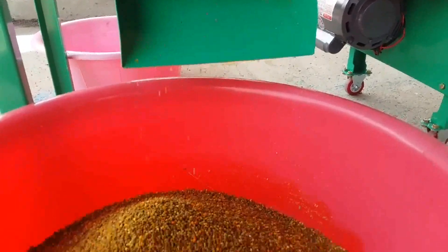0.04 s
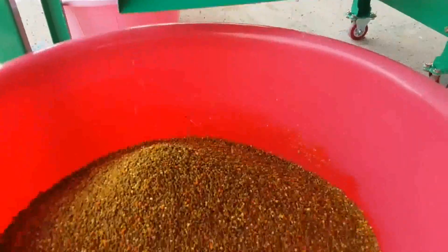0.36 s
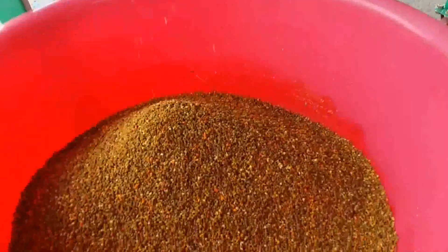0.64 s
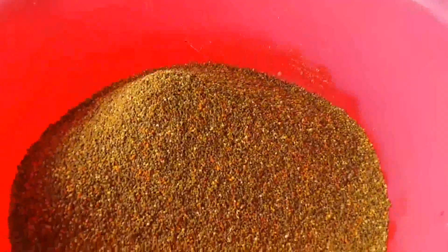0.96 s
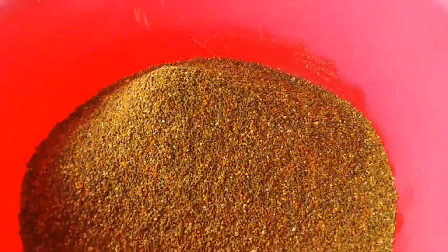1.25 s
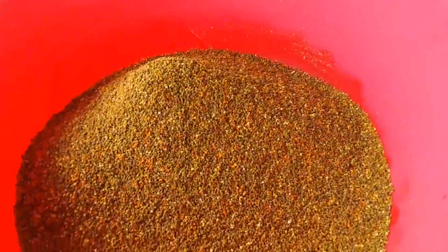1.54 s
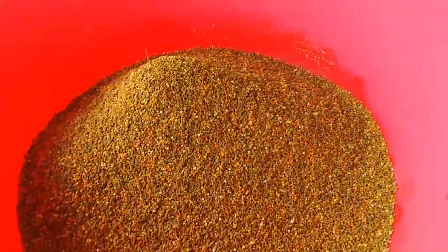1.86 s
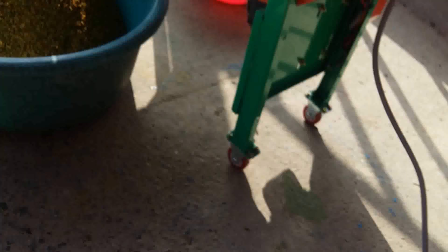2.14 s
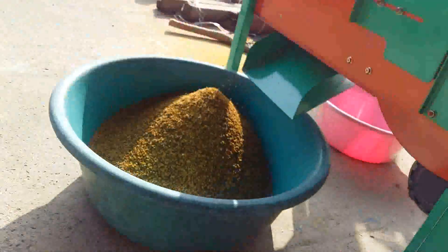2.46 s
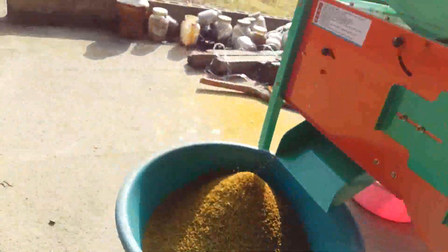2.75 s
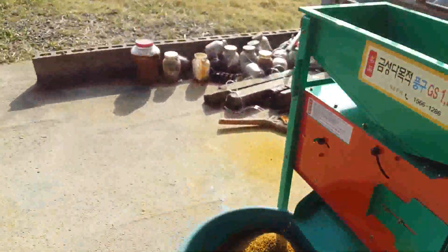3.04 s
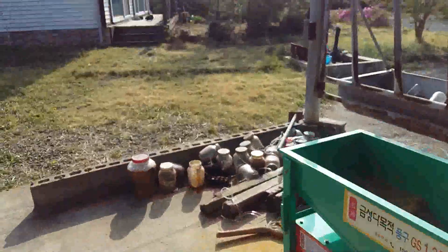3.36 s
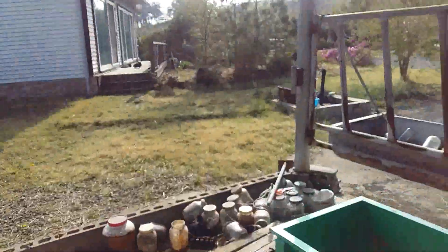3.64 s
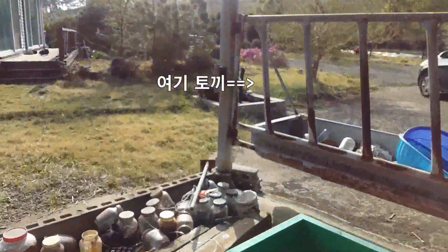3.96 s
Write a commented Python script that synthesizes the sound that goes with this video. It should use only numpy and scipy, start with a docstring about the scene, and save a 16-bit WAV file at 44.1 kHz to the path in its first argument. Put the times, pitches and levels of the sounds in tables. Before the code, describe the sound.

A sorting machine hums and rattles in a yard, heard close up, as fine granules patter into a plastic tub. The sound drops out twice, then fades in a step away with light sieve knocks and faint shoe scuffs.

```python
"""Pollen sorter in a yard

A motor hums at twice the mains rate, its shaft shakes the sheet-metal housing, and the sieves rattle.
Pollen granules trickle into a plastic tub, with a few faint squeaks and ticks.
It is heard first from beside the tub. The sound drops out twice, then fades in from a step away,
where the sieves knock and shoes scuff the concrete."""
import sys
import numpy as np
from scipy.fft import rfft, irfft, next_fast_len
from scipy.io import wavfile
from scipy.ndimage import map_coordinates

SR = 44100
rng = np.random.default_rng(int(sys.argv[2]) if len(sys.argv) > 2 else 0)


def put_to_file(sound):
    """Save the sound as 16-bit audio at rate SR, in the file named by the first command-line argument."""
    columns = np.atleast_2d(sound).T  # one column per channel
    safe = np.clip(columns, -1, 1)
    whole_steps = np.round(safe * 32767)
    wavfile.write(sys.argv[1], SR, whole_steps.astype(np.int16))


N = 176400

HUM_HZ, SHAFT_HZ = 120.0, 24.32
SIEVE_HZ, SIEVE_WIDTH_HZ = 523.5, 50  # the sieve's hollow ring
NEAR, AWAY = 0, 1  # where the listener stands: beside the tub, or a step away


def amp(db):
    """Turn decibels into a gain."""
    return 10 ** (np.asarray(db) / 20)


def unit(x):
    """Scale a signal to an average strength (rms) of 1."""
    return x / np.sqrt(np.mean(x ** 2) + 1e-20)


def clock():
    """The time of every sample, in seconds."""
    return np.arange(N) / SR


def along(points, hz):
    """Read between (frequency, value) points on a logarithmic frequency scale."""
    freqs, values = np.transpose(points)
    return np.interp(np.log(hz + 1), np.log(freqs + 1), values)


def curve(rows):
    """Join (time, value) points with straight lines, one value a sample."""
    return np.interp(clock(), *np.transpose(rows))


def wobble(rate):
    """A smooth curve through `rate` random values a second."""
    return map_coordinates(rng.standard_normal(int(N * rate / SR) + 4), [clock() * rate])


def swell(start, length):
    """A rounded rise and fall."""
    return np.sin(np.pi * np.clip((clock() - start) / length, 0, 1))


def pan(db):
    """Left and right gains that make the left side `db` louder than the right."""
    gains = amp(np.array([np.atleast_1d(db), -np.atleast_1d(db)]) / 2)
    return gains / gains.mean(axis=0)


def filtered(x, response):
    """Multiply each frequency in x by response(hz)."""
    size = next_fast_len(N + SR // 4)
    return irfft(rfft(x, size) * response(np.fft.rfftfreq(size, 1 / SR)), size)[..., :N]


def noise(colour):
    """Stereo noise shaped by colour(hz); the two sides match in the bass and differ in the treble."""
    # how alike left and right are (1 = the same): f/Hz, likeness
    likeness = [(30, 1), (120, 1), (300, 0.85), (600, 0.68), (1100, 0.52), (2200, .08), (12000, 0.039)]

    def shares(hz):
        angle = np.arccos(np.clip(along(likeness, hz), -1, 1)) / 2
        return colour(hz) * np.array([np.cos(angle), np.sin(angle)])

    mid, side = filtered(rng.standard_normal((2, N)), shares)
    return np.array([mid + side, mid - side]) / mid.std()


def rotation(hz, drift):
    """The angle of something that turns at a nearly steady rate."""
    return 2 * np.pi * np.cumsum(hz * (1 + drift * wobble(6.804))) / SR


def tone(angle):
    """A sine wave of strength (rms) 1 that starts anywhere in its cycle."""
    return np.sqrt(2) * np.sin(angle + rng.uniform(0, 2 * np.pi))


def overtones(angle, rows, place, waver_db=1.8):
    """Tones at whole multiples of one rate, each wavering a little in level."""
    return sum(amp(db[place] + waver_db * wobble(9)) * tone(round(k) * angle) for k, *db in rows)


def ring(centre, width):
    """A part shaken at random rings in a narrow band around its own pitch."""
    return noise(lambda hz: 1 / (1 + ((hz - centre) / width) ** 2))


def motor_hum(angle, place, level_db):
    """The motor hums at twice the mains rate; overtones add a buzz."""
    # overtones of the hum: multiple, near level/dB, away level/dB
    buzz = [(2, -39, -45), (3, -37.5, -42), (5, -41.5, -48.5), (6, -44, -48), (7, -46, -62),
            (8, -44.5, -52), (10, -49, -69)]
    return amp(level_db) * tone(angle) + overtones(angle, buzz, place)


def shaft_shake(angle, place):
    """The shaft shakes the housing at multiples of its turning rate."""
    # tones of the shaking: multiple, near level/dB, away level/dB
    shake = [(3, -50, -52.5), (4, -30, -43), (6, -29.5, -37), (7, -43, -51), (8, -47, -50), (9, -44, -44.5),
             (10, -50, -59), (11, -36, -37.5), (12, -46, -39), (13, -44, -67), (15, -60, -48.5),
             (19, -42, -47.5), (21, -53, -44.5), (22, -54, -57), (24, -42, -52), (29, -42, -71)]
    return overtones(angle, shake, place)


def sieve_stroke(peak_s=3.042):
    """The sieve swings to and fro, between -1 and 1, once for two turns of the shaft."""
    return np.cos(np.pi * SHAFT_HZ * (clock() - peak_s))


def rattle(place, colour, rattle_db, sieve_db):
    """The shaken housing and sieves make a broad noise, and the sieve and metal panels ring."""
    # ringing panels: f/Hz, width/Hz, near level/dB, away level/dB
    panels = [(281, 36, -43, -40.5), (630, 30, -42.5, -49.5), (701, 39, -50, -50.5), (820, 50, -40, -61),
              (949, 36, -40, -51.5), (1186, 34, -38, -47), (1248.6, 12, -39, -50), (2074, 12, -48, -56),
              (2500, 18, -49.5, -69)]
    sound = amp(rattle_db) * noise(lambda hz: amp(along(colour, hz)))
    sound += amp(sieve_db) * ring(SIEVE_HZ, SIEVE_WIDTH_HZ)
    for centre, width, *db in panels:
        sound += amp(db[place]) * ring(centre, width)
    return sound


def flutter(sound, hum_angle, shaft_angle, flutter_db, shaft_depth=0.11, hum_depth=0.071):
    """Above the bass, the rattle pulses with the shaft and the hum, and flickers at random."""
    shaft_pulse = tone(shaft_angle) / 2 + tone(2 * shaft_angle) + tone(4 * shaft_angle)
    hum_pulse = tone(hum_angle) + tone(2 * hum_angle)
    drive = unit(np.exp((shaft_depth * shaft_pulse + hum_depth * hum_pulse) / 2))
    bass = filtered(sound, lambda hz: 1 / (1 + (hz / 220) ** 4))
    return bass + (sound - bass) * drive * amp(flutter_db * wobble(28.08))


def machine(place, hum_db, colour, balance, rattle_db, sieve_db, flutter_db):
    """The motor, the shaft and the rattle they drive, spread between left and right."""
    hum_angle = rotation(HUM_HZ, drift=.0005)
    shaft_angle = rotation(SHAFT_HZ, drift=.0025)
    tones = motor_hum(hum_angle, place, hum_db) + shaft_shake(shaft_angle, place)
    rattling = rattle(place, colour, rattle_db, sieve_db)
    rattling = flutter(rattling, hum_angle, shaft_angle, flutter_db)
    return filtered(tones + rattling, lambda hz: pan(along(balance, hz)))


def machine_near():
    """The sorter from beside the tub: a strong hum over an even rattle."""
    # loudness of the hum: t/s, level/dB
    hum_levels = [(0.03, -13), (0.442, -15.5), (0.668, -13), (0.998, -16), (1.116, -12.5), (1.524, -15.5),
                  (1.57, -13), (1.812, -13), (1.848, -16), (1.88, -14.5)]
    # tone colour of the rattle: f/Hz, relative level/dB
    colour = [(25, -21.5), (60, -12.5), (110, -2.5), (170, -3.5), (215, -7.5), (300, -4.5), (400, -11),
              (530, -6.5), (680, -13), (1000, -14), (1270, -20), (1350, -15.5), (2400, -19.5), (4000, -22),
              (7000, -31.5), (10000, -42), (15000, -51.5)]
    # which side is louder: f/Hz, left minus right/dB
    balance = [(110, -2.5), (380, 0.5), (700, -2), (2400, -2), (5000, -6), (15000, 0.5)]
    stroke = sieve_stroke()
    return machine(NEAR, curve(hum_levels), colour, balance,
                   rattle_db=-26.5 - 0.2 * stroke, sieve_db=-41.5 + stroke, flutter_db=0.14)


def machine_away():
    """The sorter from a step away: the hum sinks and the sieve chugs more clearly."""
    # loudness of the hum: t/s, level/dB
    hum_levels = [(2.72, -18.5), (2.88, -23), (3.19, -27), (3.31, -26), (3.45, -34), (3.62, -40),
                  (3.8, -33), (3.95, -33)]
    # loudness of the rattle: t/s, level/dB
    rattle_levels = [(2.6, -28.5), (2.72, -26), (2.86, -28), (3.0, -29.5), (3.15, -31), (3.3, -32.5),
                     (3.43, -33), (3.5, -33), (3.64, -29), (3.7, -32), (4.0, -31.5)]
    # tone colour of the rattle: f/Hz, relative level/dB
    colour = [(25, -23), (60, -9), (85, -5), (125, 8), (180, -0.5), (280, -4), (380, -1.5), (450, -8),
              (530, -1), (700, -7.5), (1000, -9.5), (1600, -12), (2300, -12), (3200, -17.5), (6000, -17.5),
              (9500, -30), (15500, -33)]
    # which side is louder: f/Hz, left minus right/dB
    balance = [(110, 1), (700, -2), (1300, -3.5), (2400, -8.5), (4400, -3), (7000, 1.5), (15000, -6.5)]
    stroke = sieve_stroke()
    return machine(AWAY, curve(hum_levels), colour, balance,
                   rattle_db=curve(rattle_levels) + 0.97 * stroke, sieve_db=-46 + 3 * stroke,
                   flutter_db=1.7)


def pollen(grains_per_s=3600, chinks_per_s=55, chink_hz=4700, chink_s=.016, chink_db=-5.5):
    """Thousands of granules a second patter unevenly into the tub; a few make the chute chink."""
    # tone colour of the landing granules: f/Hz, relative level/dB
    colour = [(600, -30), (2000, -6.5), (3000, -3), (4300, -1.5), (5400, 1.5), (6200, -4), (7000, -18.5),
              (9000, -25), (15000, -34.5)]
    # loudness of the stream: t/s, level/dB
    flow = [(0, -45), (.15, -39), (.45, -38), (.51, -33.5), (.59, -35), (.68, -43), (.82, -36.5),
            (1.0, -34), (1.4, -35), (1.9, -34.5), (2.2, -32.5)]
    hits = (rng.random((2, N)) < grains_per_s / SR) * rng.standard_normal((2, N))
    patter = unit(filtered(hits, lambda hz: amp(along(colour, hz))))
    patter *= amp(1.2 * wobble(45))
    age = np.arange(SR // 20) / SR
    shape = np.sin(np.pi * np.clip(age / chink_s, 0, 1))
    chinks = np.zeros(N + len(age))
    for when, pitch, size in rng.random((int(chinks_per_s * N / SR), 3)):
        hz = chink_hz * np.exp(.27 * (2 * pitch - 1))
        start = int(when * N)
        chinks[start:start + len(age)] += 2 * size * shape * np.sin(2 * np.pi * hz * age)
    return (patter + amp(chink_db) * chinks[:N]) * amp(curve(flow)) * pan(-13.5)


def ticks(rise_s=.0002):
    """Light ticks, and the click as the sound cuts out: a sharp snap and a tail that dies at once."""
    # ticks and clicks: t/s, level/dB, f/Hz, half-width/octaves, time to fade by 60 dB/s,
    # tail relative to snap/dB, left minus right/dB
    clicks = [(0.4858, -23.5, 6500, 0.36, 0.0077, -0.5, 11), (0.4866, -17, 6600, 0.45, .004, -4, 16),
              (0.4885, -13, 4140, 0.4, 0.0053, 0, 16), (2.2122, -25, 7500, 0.85, 0.00202, -11, -1.5),
              (2.9964, -19, 3000, .9, .002, -14, -12), (3.0004, -14, 5400, 0.62, 0.006, -7.5, 0),
              (3.185, -15, 3180, 0.89, .003, -14, -10), (3.1874, -11, 2500, 0.95, .004, -11, -12)]
    sound = np.zeros((2, N))
    for start, db, centre, octaves, fade_s, tail_db, pan_db in clicks:
        age = np.maximum(clock() - start, 0)
        colour = lambda hz: 1 / (1 + (np.log2((hz + 1) / centre) / octaves) ** 4)
        impulse = 1. * (np.arange(N) == round(start * SR))
        snap = filtered(impulse, colour)
        tail = noise(colour) * amp(tail_db - 60 * age / fade_s) * (1 - np.exp(-age / rise_s))
        sound += amp(db) * pan(pan_db) * (snap / snap.max() + tail)
    return sound


def squeaks(roughness=.6):
    """Short, slightly rough whistles from the moving parts."""
    # whistles: t/s, length/s, f/Hz, level/dB
    whistles = [(0.897, .03, 5320, -40), (.96, 0.029, 4660, -36), (1.544, 0.024, 5250, -29),
                (1.575, .03, 4450, -38), (1.612, 0.033, 5200, -33), (1.616, 0.028, 3610, -29.5),
                (1.683, 0.043, 5270, -38), (1.765, 0.027, 5250, -35), (1.812, 0.02, 4600, -40),
                (1.853, 0.014, 3280, -30.5), (2.169, 0.026, 5600, -34.5)]
    sound = np.zeros(N)
    for start, length, hz, db in whistles:
        angle = 2 * np.pi * hz * clock() + roughness * wobble(380)
        sound += amp(db) * swell(start, length) * tone(angle)
    return sound * pan(-17.0)


def knocks(length_s=0.041, roughness=0.75, clatter_db=-1.5):
    """The harder strokes of the sieve: a hollow bump and a brief clatter of the mesh."""
    # hard strokes: t/s, level/dB
    strokes = [(2.775, -36), (2.855, -37), (2.943, -34.5), (3.019, -30), (3.11, -33), (3.228, -34),
               (3.335, -31), (3.415, -28), (3.495, -34.5), (3.6, -36), (3.685, -32.5), (3.768, -34.5),
               (3.841, -32), (3.925, -32)]
    # tone colour of the mesh: f/Hz, relative level/dB
    colour = [(150, -21), (350, 0), (600, 2.5), (850, -2.5), (1250, -6.5), (2300, -7), (4000, -35),
              (12000, -46)]
    level = sum(amp(db) * swell(start, length_s) for start, db in strokes)
    bump = tone(2 * np.pi * SIEVE_HZ * clock() + roughness * wobble(110))
    clatter = noise(lambda hz: amp(along(colour, hz)))
    return level * (bump + amp(clatter_db) * clatter) * pan(-2.1)


def scuffs():
    """Soles brush over gritty concrete."""
    # shoe movements: t/s, length/s, level/dB, left minus right/dB
    steps = [(3.241, 0.12, -43.5, 11), (3.37, 0.089, -38.5, 13), (3.546, 0.062, -43, 15),
             (3.656, 0.064, -37, 16)]
    # tone colour of the grit: f/Hz, relative level/dB
    colour = [(1500, -24), (4000, -4.5), (6000, 5.5), (7500, -3.5), (10000, -14.5), (15000, -24)]
    grit = noise(lambda hz: amp(along(colour, hz))) * amp(2.3 * wobble(350))
    return grit * sum(amp(db) * pan(pan_db) * swell(start, length) for start, length, db, pan_db in steps)


def from_right(x, lag_s=.00008):
    """Sound from the right reaches the left side a moment later."""
    return filtered(x, lambda hz: np.exp(1j * np.pi * hz * lag_s * np.array([[-1], [1]])))


def scene(fade_start_s=2.544, fade_s=0.34):
    """The sound beside the tub cuts out twice, then the sound from a step away fades in."""
    # the sound beside the tub, on (1) or off (0): t/s, gain
    on_off = [(1.9225, 1), (1.9245, 0), (2.1095, 0), (2.1115, 1), (2.2135, 1), (2.21355, 0)]
    near = machine_near()
    away = from_right(machine_away() + knocks()) + scuffs()
    fade_in = np.clip((clock() - fade_start_s) / fade_s, 0, 1) ** 0.94
    return away * fade_in + ticks() + (near + squeaks() + pollen()) * curve(on_off)


def record(dry):
    """Cut away the very highest treble."""
    top_hz, edge_hz = 15800, 100
    return filtered(dry, lambda hz: np.clip((top_hz - hz) / edge_hz + .5, 0, 1))


dry = scene()
out = record(dry)
put_to_file(out)
```